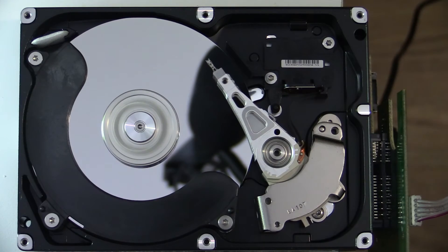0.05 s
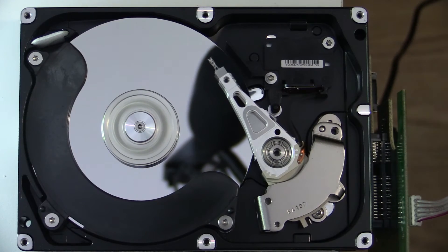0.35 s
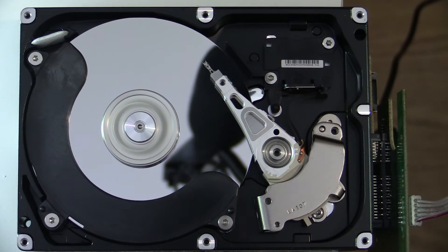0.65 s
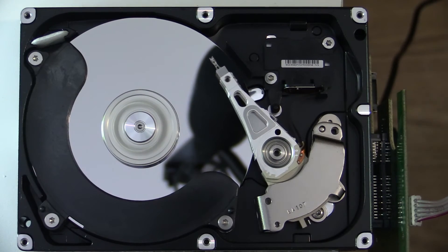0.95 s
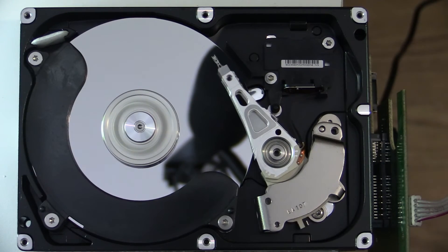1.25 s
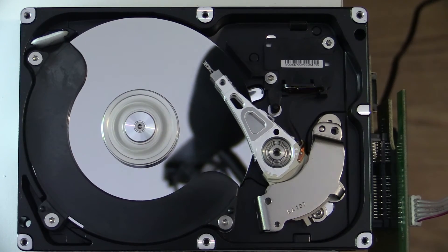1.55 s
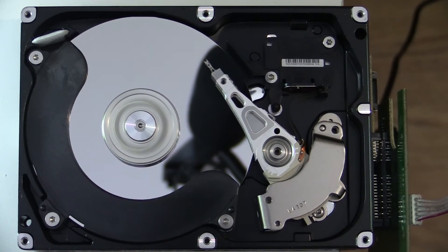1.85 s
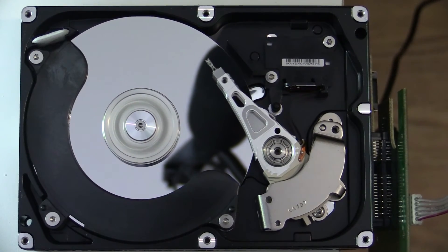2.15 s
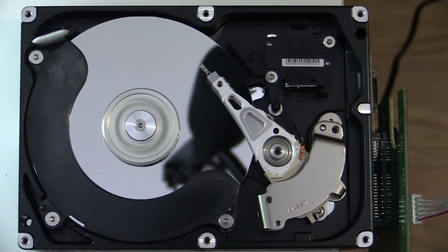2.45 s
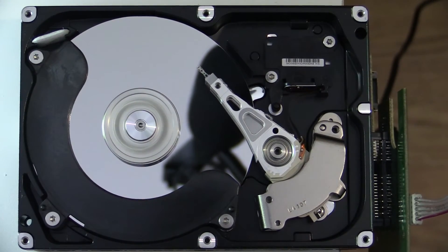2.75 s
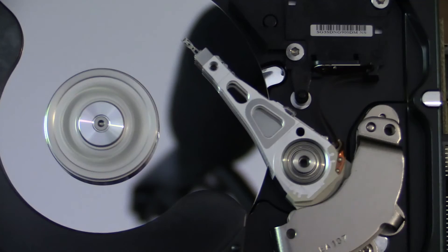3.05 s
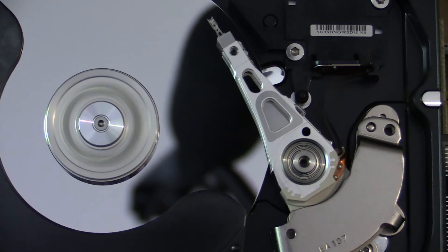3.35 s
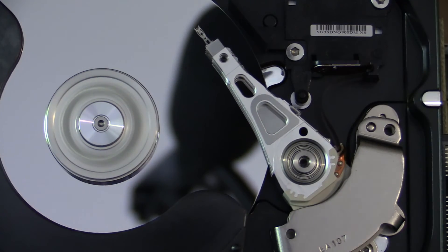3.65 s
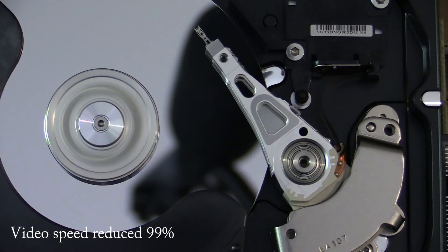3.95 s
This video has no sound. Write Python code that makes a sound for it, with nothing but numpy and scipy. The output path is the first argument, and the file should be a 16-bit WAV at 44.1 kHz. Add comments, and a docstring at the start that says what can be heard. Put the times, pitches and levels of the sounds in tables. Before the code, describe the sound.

An open hard drive's arm ticks and knocks in irregular bursts, with brief thin high tones between. It pauses for a second, then resumes. The platter whirs steadily underneath, close to the microphone in a quiet room.

```python
"""Dry ticks and ringing knocks come in bursts from an open hard drive, close to the microphone.
Its arm ticks as it sets off on a seek and knocks as it brakes; after some small moves the servo
sings on the arm's main resonance. Behind it, in a quiet room, the platter hums and whirs at 120
turns a second, and its draught rumbles on the microphone."""
import sys
import numpy as np
from scipy import signal
from scipy.fft import rfft, irfft
from scipy.io import wavfile

SR = 44100
rng = np.random.default_rng(int(sys.argv[2]) if len(sys.argv) > 2 else 0)


def store_wav(level_fs):
    """Save 16-bit WAV to argv[1]."""
    pcm = np.round(np.clip(np.atleast_2d(level_fs), -1, 1) * 32767)
    wavfile.write(sys.argv[1], SR, pcm.T.astype(np.int16))


N = 176400


# The arm at work, close up. Each row: start in seconds, tick gain in dB, travel until braking
# in seconds, knock gain in dB, rasp gain in dB relative to RASP_DB.
ARM_SEEKS = [(0.1124, 3, 0.00062, -2, -6), (0.3141, -2.5, 0.0025, 1, 1), (0.3405, 3.5, 0.0044, -0.5, -5),
             (0.4723, 6.5, 0.00079, 0, -5), (.9280, -5.5, 0.0038, 1, 2), (.9569, -6, 0.0027, 1, 4),
             (1.0873, 5, 0.00082, -0.5, -17), (1.2966, -4, .0028, 1.5, 1), (1.3251, -3, 0.0025, 1.5, 4.5),
             (1.4557, 4, 0.000806, -0.5, -6), (1.6675, 3.5, 0.0037, 1, 1.5), (1.6960, 1.5, 0.0027, 2, 2),
             (1.8270, 5.5, 0.00087, -1.5, -6), (2.0350, -1, .0011, 2.5, -11.5),
             (3.0412, 2.5, 0.0022, 1, -22), (3.1718, 1.5, 0.00084, -1, -9.5),
             (3.3868, 2.5, 0.0023, 1.5, -6), (3.4147, 1, 0.0046, 1.5, -1.5), (3.547, 4.5, .0008, 0, 2.5)]
# The arm's bending modes, rung by braking. Each row: pitch in Hz, relative level in dB, t60 in seconds.
BENDING_MODES = [(2209, -19.5, 0.096), (2416, -3.5, 0.053), (2569, -5, 0.028), (2710, -24, .018)]
RASP_DB = -14

def seeks():
    """The arm rasps and ticks as it sets off, and knocks as it brakes."""
    out = np.zeros(N)
    for start, tick_db, travel, knock_db, rasp_db in ARM_SEEKS:
        swell_s, judder = rasp()
        add(out, start - swell_s, amp(RASP_DB + rasp_db) * judder)
        add(out, start - PUSH_LEAD_S, amp(tick_db) * tick())
        add(out, start + travel, amp(knock_db) * ring(BENDING_MODES))
    return out


# The stiffer modes of arm and coil. Each row: pitch in Hz, relative level in dB, t60 in seconds.
STIFF_MODES = [(1570, -68.5, .02), (2184, -21.5, 0.0061), (2476, -13, 0.034), (3267, -22.5, 0.02),
               (3360, -24.5, 0.021), (4010, -23.5, 0.031), (4685, -33, 0.024), (5250, -43, .006),
               (9220, -44, 0.011), (12300, -50.5, .012)]
PUSH_LEAD_S, PUSH_DB = 0.0016, -16
SNAP_DB, SNAP_PEAK_S, SNAP_TOP_HZ = -35.5, 0.002, 7500

def tick():
    """The coil takes up the load with a light push, then jerks the arm: it rings, with a soft snap."""
    out = amp(PUSH_DB) * ring(STIFF_MODES, unevenness=0.96)
    add(out, PUSH_LEAD_S, ring(STIFF_MODES, unevenness=0.89))
    t = np.arange(len(out)) / SR
    snap = signal.lfilter(*signal.butter(2, SNAP_TOP_HZ, fs=SR), rng.standard_normal(len(t)))
    envelope = t / SNAP_PEAK_S * np.exp(1 - t / SNAP_PEAK_S)
    return out + amp(SNAP_DB) * envelope * snap


def rasp(samples=1024, rise_s=0.0045):
    """The coil judders as it speeds the arm up; returns the swell's length in seconds and the sound."""
    swell = np.exp(np.arange(-samples, 0) / SR / rise_s)
    body = ring(STIFF_MODES)
    judder = swell * rng.standard_normal(samples)
    return samples / SR, signal.fftconvolve(judder, body / np.linalg.norm(body))


def ring(modes, unevenness=0, detune=0.0023, spread_db=1.5):
    """Dying modes of alternating sign swell together, then beat; uneven blows vary pitch and colour."""
    t = np.arange(SR // 10) / SR
    stretch, colour = unevenness * rng.standard_normal((2, len(modes)))
    out = np.zeros(len(t))
    for k, (hz, db, t60) in enumerate(modes):
        envelope = amp(db + spread_db * colour[k] - 60 * t / t60)
        out += (-1) ** k * envelope * np.sin(2 * np.pi * hz * (1 + detune * stretch[k]) * t)
    return out


# Small moves that leave the servo singing. Each row: start in seconds, tick gain in dB,
# tone length in seconds, tone level in dB, fade in dB per second.
SERVO_MOVES = [(0.241, 2, 0.063, -16, 169), (0.6023, 3, 0.32, -14.5, 19.5), (1.2166, 3.5, 0.066, -15, 170),
               (1.585, 4.5, .079, -15, 140), (1.9558, 3, 0.078, -15, 102), (3.301, 2.5, 0.078, -15.5, 154),
               (3.6758, 2, 0.15, -15, 11)]
SING_HZ, SING_RISE_S, SING_STOP_S, SING_WAVER = 2415, 0.0024, 0.0036, 0.061

def servo():
    """A tick, then the servo holds the arm ringing; returns the ticks and the tone apart."""
    ticks, tone = np.zeros(N), np.zeros(N)
    for start, tick_db, length, tone_db, fade in SERVO_MOVES:
        t = np.arange(0, length, 1 / SR)
        gate = (1 - np.exp(-t / SING_RISE_S)) * np.minimum((length - t) / SING_STOP_S, 1)
        add(ticks, start - PUSH_LEAD_S, amp(tick_db) * tick())
        add(tone, start, gate * amp(tone_db - fade * t) * np.sin(2 * np.pi * SING_HZ * t))
    return ticks, tone * (1 + SING_WAVER * wander(rate_hz=40))


# The hum under the clicks. Each row: pitch in Hz, rms level in dB.
SPINDLE_HUM = [(39.6, -43), (120, -40.5), (152.4, -49.5), (229, -46.5), (240, -40), (278, -54),
               (360, -55.5), (380, -50), (513, -50.5), (541.7, -52.5), (652, -51), (807, -59.5), (837, -52),
               (930, -55)]
# A faint whistle, fading away. Each row: time in seconds, rms level in dB.
WHISTLE_LEVELS = [(0, -65), (1.9, -66), (2.6, -70), (3.8, -80.5)]
HUM_WAVER, HUM_DRIFT_HZ = 0.11, 0.85
WHISTLE_HZ, WHISTLE_WAVER = 15735, 0.3

def spindle():
    """Spindle and bearings hum, wavering in level and pitch, with a thin whistle far above."""
    t = np.arange(N) / SR
    hum = np.zeros(N)
    for hz, db in SPINDLE_HUM:
        level = amp(db) * (1 + HUM_WAVER * wander(rate_hz=5))
        cycles = rng.random() + np.cumsum(hz + HUM_DRIFT_HZ * wander(rate_hz=4.2)) / SR
        hum += level * np.sin(2 * np.pi * cycles)
    level = amp(np.interp(t, *np.transpose(WHISTLE_LEVELS))) * (1 + WHISTLE_WAVER * wander(rate_hz=12))
    whistle = level * np.sin(2 * np.pi * WHISTLE_HZ * t)
    return np.sqrt(2) * (hum + whistle)


# The whir beside the open platter. Each row: frequency in Hz, relative noise density in dB.
WHIR_SPECTRUM = [(30, -21.5), (60, -12.5), (100, -11.5), (135, -11.5), (185, -11.5), (225, -11),
                 (255, -9.5), (290, -9), (340, -14), (410, -13), (490, -16.5), (730, -20.5), (900, -18),
                 (1080, -19), (1550, -16.5), (1750, -20), (2000, -19), (2200, -9), (2370, -6),
                 (2800, -13.5), (3170, -10), (3600, -17.5), (3850, -23), (4150, -22), (4800, -29),
                 (5600, -27), (6100, -29.5), (7200, -29.5), (8250, -29), (8600, -31.5), (9600, -33.5),
                 (10300, -38.5), (12800, -43), (15800, -52.5)]
WHIR_DB, WHIR_FLICKER_DB, TURN_HZ, TURN_DEPTH = -29.5, 0.77, 120, 0.06

def whir():
    """Air sheared by the platter flickers in level and pulses slightly with each turn."""
    t = np.arange(N) / SR
    pulse = 1 + TURN_DEPTH * np.sin(2 * np.pi * TURN_HZ * t)
    return noise(WHIR_SPECTRUM) * amp(WHIR_DB + WHIR_FLICKER_DB * wander(rate_hz=44)) * pulse


# Wind rumble right on the microphone. Each row: frequency in Hz, relative noise density in dB.
DRAUGHT_SPECTRUM = [(4, -41.5), (10, -22), (14, 3.5), (22, -4), (27, -16), (33, -22.5), (39, -12),
                    (46, -15.5), (56, -36.5), (90, -32), (200, -88)]
# Its rise and fall. Each row: time in seconds, level in dB.
DRAUGHT_LEVELS = [(0, -27.5), (.2, -23.5), (.33, -22.5), (.58, -17.5), (.85, -24.5), (1.15, -25),
                  (1.5, -24.5), (1.68, -16), (2.08, -14.5), (2.26, -17), (2.42, -29.5), (2.7, -24),
                  (3.0, -38.5), (3.8, -52)]
PUFF_AT_S, PUFF_WIDTH_S, PUFF_HZ, PUFF_DB = 1.503, 0.016, 99.6, -21.5

def draught():
    """Air from the platter buffets the microphone; one soft, low bump stands out."""
    t = np.arange(N) / SR
    rumble = noise(DRAUGHT_SPECTRUM) * amp(np.interp(t, *np.transpose(DRAUGHT_LEVELS)))
    puff_level = amp(PUFF_DB) * np.exp(-((t - PUFF_AT_S) / PUFF_WIDTH_S) ** 2)
    return rumble + puff_level * np.sin(2 * np.pi * PUFF_HZ * t)


# The quiet room around the drive. Each row: frequency in Hz, t60 in seconds.
ROOM_DECAY = [(200, .25), (2400, 0.14), (8000, .15)]
ROOM_DB, ROOM_DELAY_S = -14, 0.0089

def room(sound):
    """Desk and walls send a short, diffuse tail back to the microphone."""
    hz, t, spectra = signal.stft(rng.standard_normal(SR // 2), SR, nperseg=256)
    decay = amp(-60 * t / at_frequency(ROOM_DECAY, hz)[:, None])
    tail = signal.istft(spectra * decay, SR, nperseg=256)[1]
    tail *= np.arange(len(tail)) > ROOM_DELAY_S * SR
    return amp(ROOM_DB) * signal.fftconvolve(sound, tail / np.linalg.norm(tail))[:N]


def amp(db):
    """Decibels to gain."""
    return 10 ** (np.asarray(db) / 20)


def unit(x):
    """Scales to rms 1."""
    return x / np.sqrt(np.mean(x ** 2) + 1e-20)


def at_frequency(points, hz):
    """Reads a table on a log-frequency axis."""
    table_hz, values = np.transpose(points)
    return np.interp(np.log(hz + 1), np.log(table_hz + 1), values)


def add(mix, start_s, sound):
    """Mixes a sound in at the given time."""
    part = mix[max(round(start_s * SR), 0):][:len(sound)]
    part += sound[:len(part)]


def noise(spectrum):
    """Noise of rms 1 with the given spectral shape."""
    gain = amp(at_frequency(spectrum, np.fft.rfftfreq(N, 1 / SR)))
    return unit(irfft(rfft(rng.standard_normal(N)) * gain, N))


def wander(rate_hz):
    """Slow random movement of rms 1."""
    rolloff = 1 + (np.fft.rfftfreq(N, 1 / SR) / rate_hz) ** 4
    return unit(irfft(rfft(rng.standard_normal(N)) / rolloff, N))


def scene():
    """The drive at one close microphone; only the clicks carry into the room."""
    ticks, tone = servo()
    clicks = seeks() + ticks
    return (clicks + room(clicks) + tone + spindle() + whir() + draught())[None]


OVERLOAD_KNEE, STOP_S, TOP_HZ = 4.94, 3.8294, 16100

def record(dry):
    """The loudest knocks overload softly, the sound stops dead, and the highest treble is cut."""
    pressed = dry / (1 + abs(dry) ** OVERLOAD_KNEE) ** (1 / OVERLOAD_KNEE)
    gate = np.arange(N) < STOP_S * SR
    lowpass = signal.firwin(511, TOP_HZ, window=("kaiser", 9), fs=SR)
    return signal.oaconvolve(pressed * gate, lowpass[None], "same")


dry = scene()
out = record(dry)
store_wav(out)
```